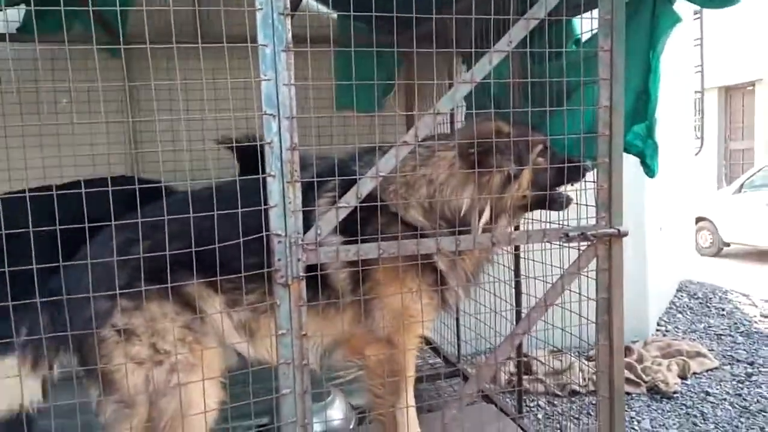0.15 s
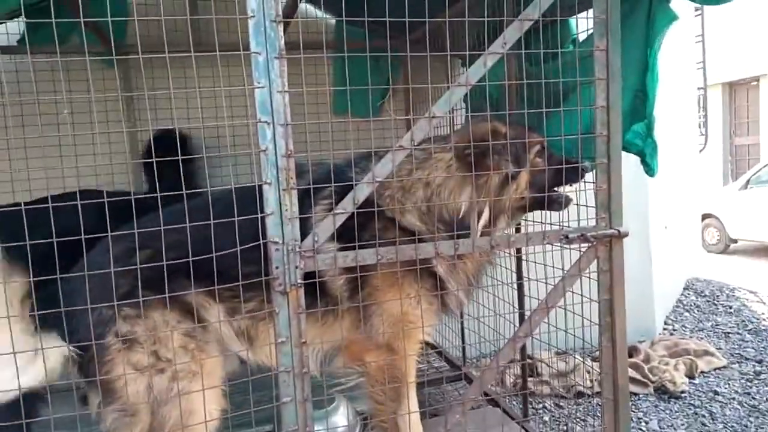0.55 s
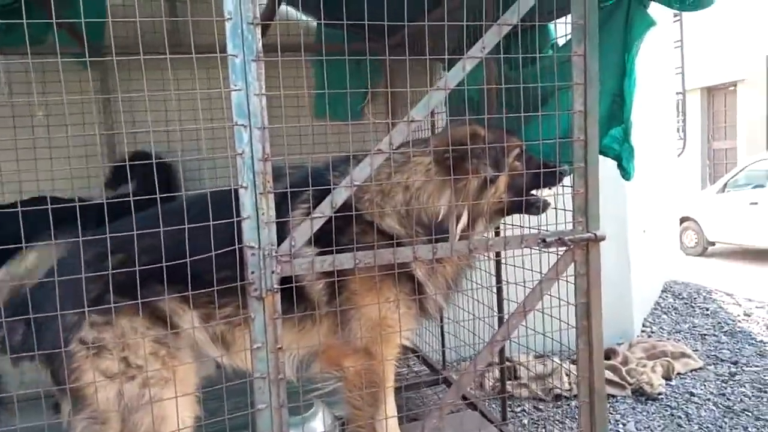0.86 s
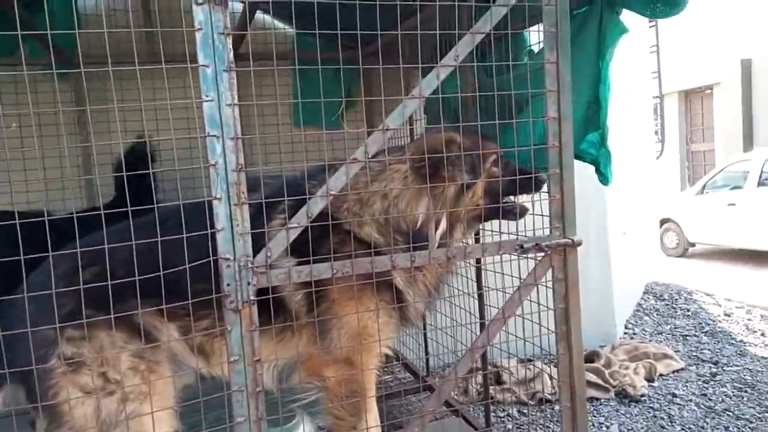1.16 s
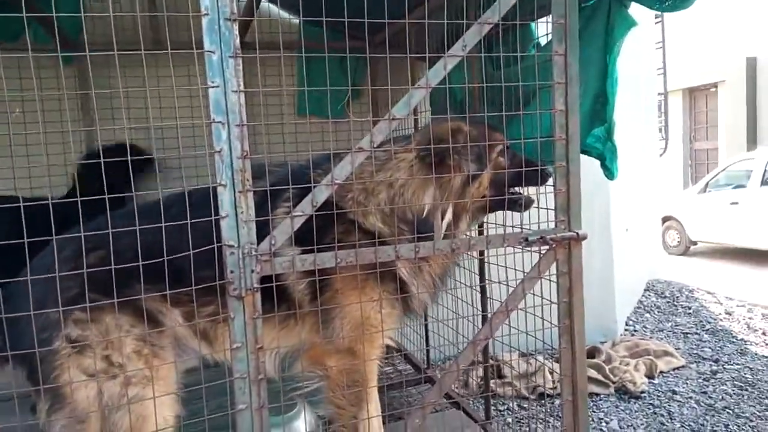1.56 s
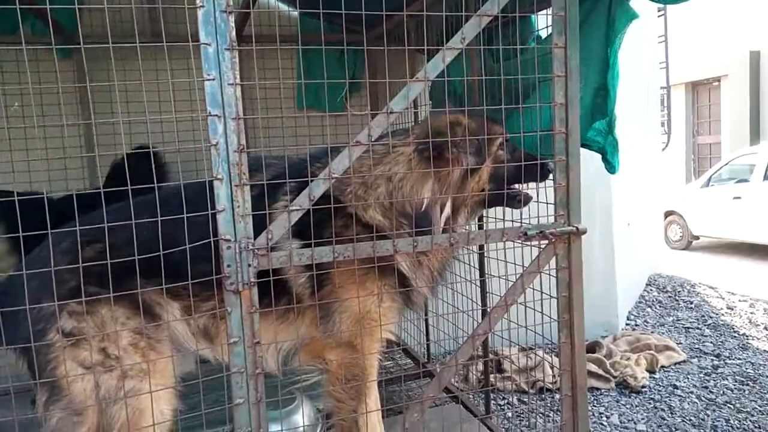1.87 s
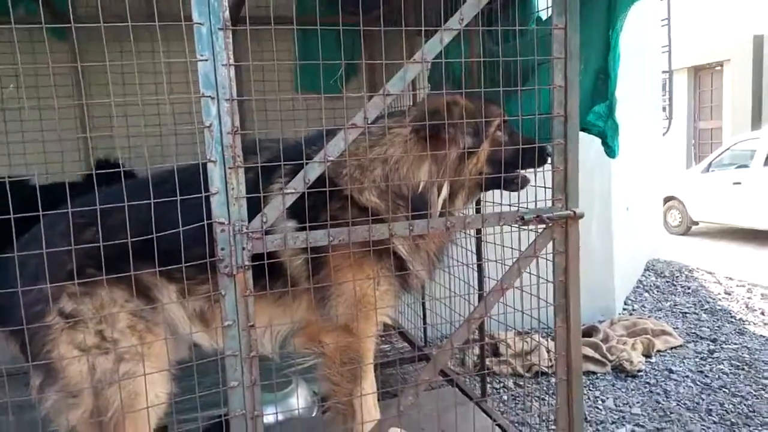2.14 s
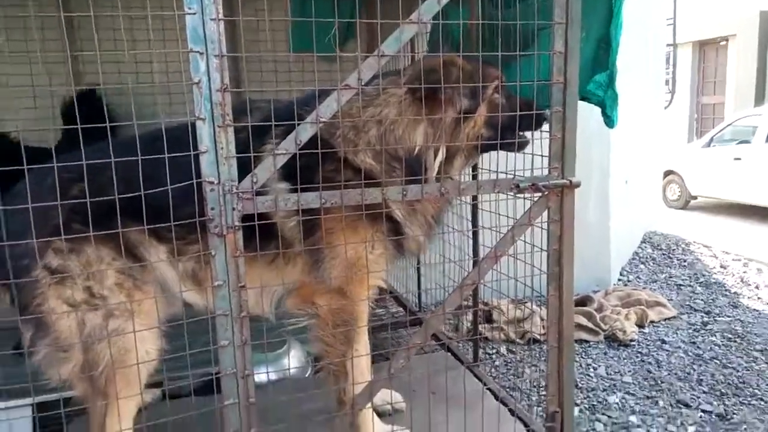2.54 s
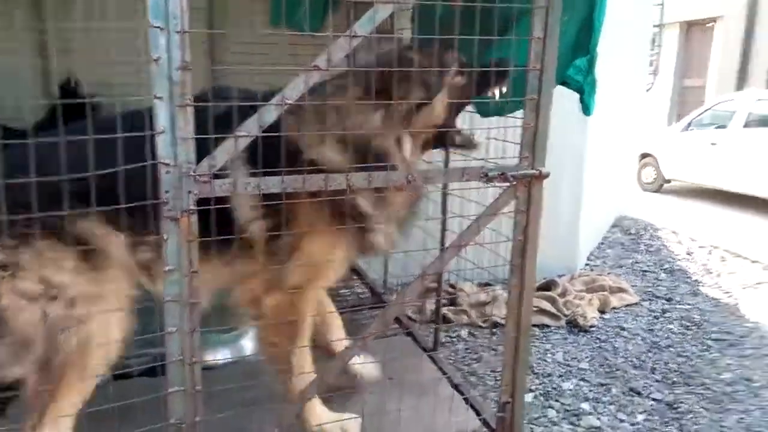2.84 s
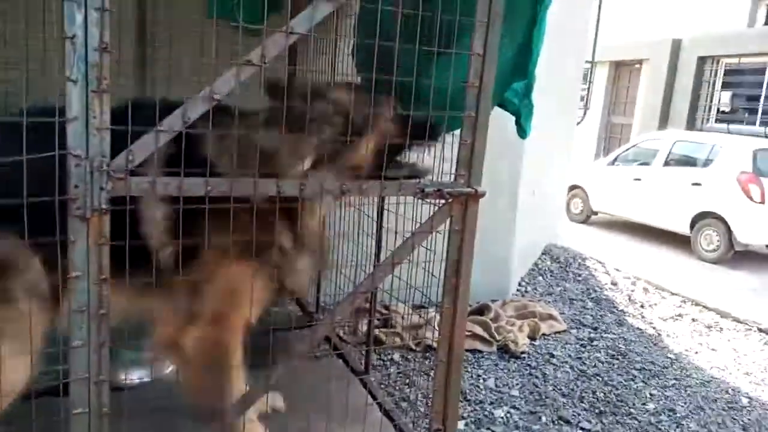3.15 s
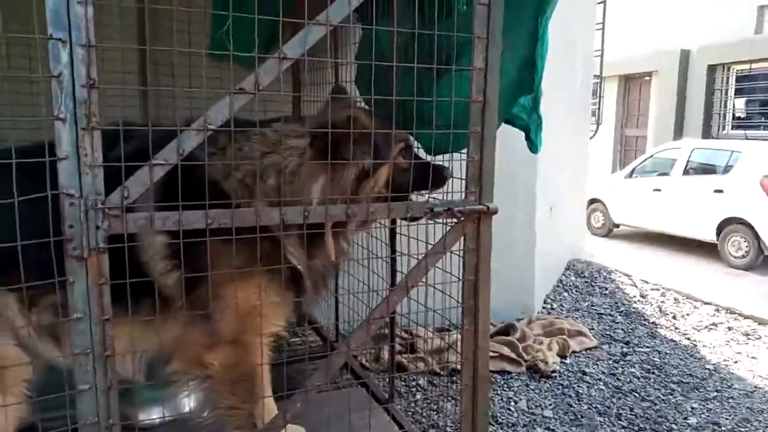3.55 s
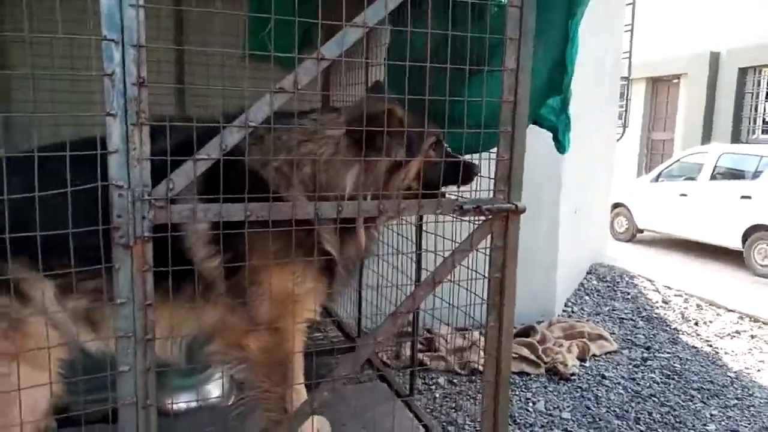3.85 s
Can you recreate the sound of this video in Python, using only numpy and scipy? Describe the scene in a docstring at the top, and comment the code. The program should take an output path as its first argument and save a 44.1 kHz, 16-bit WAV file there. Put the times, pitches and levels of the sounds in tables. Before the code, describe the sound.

A large dog close by growls low and rough, then smoother, draws a snoring breath, hums briefly and explodes into barks with a second dog; whines and a fluttering breath follow, in a wire kennel, phone microphone.

```python
"""Two big dogs in a wire kennel, a metre from a phone. First a rumbling in-breath, then the near dog growls
with shut jaws: fold pulses ring throat resonances over a chest tone. It snores in a breath, noise and
palate knocks, and hums; then both dogs bark across each other, wobbling harmonics with rasping air.
Whines trail off under a thin airy whistle, and a last in-breath flaps. Walls and roof answer the calls
briefly, coloured noise fills the yard, and the phone clips the loudest peaks."""
import sys
import numpy as np
from scipy import signal
from scipy.fft import rfft, irfft
from scipy.io import wavfile
from scipy.ndimage import uniform_filter1d

SR = 44100
rng = np.random.default_rng(int(sys.argv[2]) if len(sys.argv) > 2 else 0)


def to_wav(s):
    """Save 16-bit WAV."""
    ch = np.atleast_2d(s).T  # columns
    pcm = np.round(np.clip(ch, -1, 1) * 32767)  # PCM
    wavfile.write(sys.argv[1], SR, pcm.astype(np.int16))


N = 176400
T = np.arange(N) / SR


def undb(db):
    """Decibels to amplitude."""
    return 10 ** (np.asarray(db) / 20)


def unit(x):
    """Scale to rms 1."""
    return x / np.sqrt(np.mean(x ** 2))


def col(table, order):
    """A column of a table as a curve in time."""
    table = np.array(table)
    return np.interp(T, table[:, 0], table[:, order])


def gate(table, fade_s=0.018):
    """1 within the span of a table, short fades at its ends."""
    since_start = T - table[0][0]
    until_end = table[-1][0] - T
    return np.clip(np.minimum(since_start, until_end) / fade_s + .5, 0, 1)


def shape(points, hz):
    """Level in dB at hz, drawn through points over log frequency."""
    points = np.array(points)
    return np.interp(np.log(np.maximum(hz, 1)), np.log(points[:, 0]), points[:, 1])


def noise(points):
    """Noise coloured by (Hz, dB) points, silent below the first; rms 1."""
    hz = np.arange(N // 2 + 1) * SR / N
    gain = undb(shape(points, hz)) * (hz > points[0][0])
    return unit(irfft(rfft(rng.standard_normal(N)) * gain, N))


def ring(x, hz, width_hz):
    """One resonance."""
    return signal.lfilter(*signal.iirpeak(hz, hz / width_hz, fs=SR), x)


def ring_twice(x, hz, width_hz, second_width_hz):
    """Two resonances in a row at one frequency, for steeper sides."""
    return ring(ring(x, hz, width_hz), hz, second_width_hz)


def walk(rate_hz):
    """Smooth random curve with spread 1."""
    return unit(signal.lfilter(*signal.butter(2, rate_hz, fs=SR), rng.standard_normal(N)))


def resonate(x, peaks, lips=0):
    """Throat as parallel resonances, alternating in sign; parting lips change their gains."""
    out = 0
    for k, (hz, width_hz, db, *lip_db) in enumerate(peaks):
        gain = undb(db + sum(lip_db) * lips) * np.sqrt(60 / width_hz)
        out = out + (-1) ** k * gain * ring(x, hz, width_hz)
    return out


def airy(peaks, broad_db, lips=0):
    """Breath as noise through narrow resonances, over broad hiss; rms 1."""
    x = rng.standard_normal(N)
    band = signal.butter(3, [1200, 7500], "bandpass", fs=SR, output="sos")
    out = undb(broad_db) * signal.sosfilt(band, rng.standard_normal(N))
    for hz, width_hz, db, *lip_db in peaks:
        gain = undb(db + sum(lip_db) * lips) * np.sqrt(500 / width_hz)
        out = out + gain * ring_twice(x, hz, width_hz, 2 * width_hz)
    return unit(out)


def steady(x):
    """Even out the level over 50 ms: breath pressure holds while single cycles scatter."""
    return x / np.sqrt(uniform_filter1d(x ** 2, size=int(.05 * SR)) + 1e-12)


# Near dog, jaws shut. Each row: start in seconds, pitch in Hz, level in dB before the two dips in tone,
# level of the breath hiss in dB before it pulses with the folds.
GROWL = [(0.165, 121.7, -44.5, -52.5), (0.339, 127.4, -42, -54), (0.697, 126.7, -43, -57.5),
         (0.767, 137.7, -36.5, -55.5), (1.073, 143.5, -36.5, -56), (1.215, 152.2, -39, -51),
         (1.375, 149.7, -40, -52.5), (1.495, 143.3, -35.5, -56), (1.697, 135.4, -37, -57.5),
         (1.867, 138.9, -35.5, -54.5), (1.927, 131.5, -41.5, -61), (1.97, 130.2, -63, -63.5)]
HUM = [(2.615, 171.4, -42.5, -63), (2.639, 198.7, -48.5, -49), (2.659, 221.6, -40, -53.5),
       (2.895, 205.3, -43.5, -56), (2.93, 217.4, -40, -50)]
# Unevenness of the vocal folds. Each row: time in seconds, roughness 0-1.
ROUGH = [(0, .8), (.44, .75), (.47, .6), (.7, .6), (.77, .04), (1.18, .05), (1.28, .25), (1.4, .04),
         (2.6, .04), (2.62, .7), (2.66, .05)]
# Parting of the lips. Each row: time in seconds, opening 0-1.
LIPS = [(1.1, 0.21), (1.3, 1), (1.95, 1), (2.6, 0)]
# Resonances of the throat, then of the breath. Each row: centre in Hz, width in Hz, gain in dB before
# scaling for width, change in dB as the lips part.
THROAT = [(418.4, 37.5, 15, -0.5), (575, 26.5, -1, 7), (670, 75, -39.5, 18), (1060, 100, -9, 5.5),
          (1155, 73, -1.5, -2.5), (1287, 94, -9, 8.5), (2340, 59, -9, -6)]
HISS = [(1274, 94, 2.5, -2), (1700, 48, -1, -9.5), (1900, 64, -21, 16.5), (2390, 290, -2, 1),
        (2868, 76, -0.5, 0.5), (4625, 520, 1, -3), (5750, 77, -4.5, -7.5), (7280, 310, -7, -2.5)]
PULSE_S = .0001  # time for a fold pulse to fall to 1/e of its peak
ASPIRATE_DB, RATTLE_DB = -17.5, -9.5
CHEST_DB, CHEST_HZ = -3, 121.4  # chest level at this pitch, weaker above it
CHEST_SHAKE_DB, RATTLE_HZ = 3, 324
VALLEY_HZ, GAP_HZ = 714, 3860  # dips in the tone


def growl(table):
    """Fold pulses, uneven when rough, ring the throat; the chest carries the fundamental and a loose rattle;
    breath hisses per cycle."""
    hz, rough, lips = col(table, 1), col(ROUGH, 1), col(LIPS, 1)
    even = np.cumsum(hz) / SR  # count of cycles
    # one random timing and one random strength per cycle
    chance = rng.standard_normal((1200, 2))[even.astype(int)]
    jitter = uniform_filter1d(chance[:, 0], size=150)
    part = (even + rough * 0.15 * jitter) % 1
    from_pulse_s = np.minimum(part, 1 - part) / hz
    pulses = np.exp(-(from_pulse_s / PULSE_S) ** 2) * undb(rough * 4.7 * chance[:, 1])
    cycle_puff = np.exp(-part / 0.98)

    source = unit(pulses - uniform_filter1d(pulses, size=600))
    source = source + undb(ASPIRATE_DB) * cycle_puff * rng.standard_normal(N)
    voiced = steady(resonate(source, THROAT, lips))
    chest = undb(CHEST_DB) * (CHEST_HZ / hz) * np.sqrt(2) * np.sin(2 * np.pi * even - .8)
    chest = chest * undb(CHEST_SHAKE_DB * rough * walk(19))
    rattle = unit(ring_twice(pulses * chance[:, 0], RATTLE_HZ, 160, 160))
    chest = chest + rough * undb(RATTLE_DB) * rattle
    hiss = airy(HISS, -36, lips) * (0.26 + cycle_puff) * undb(walk(25))

    out = unit(voiced + chest) * undb(col(table, 2)) + hiss * undb(col(table, 3))
    # rough folds deepen the lower dip, parted lips fill the upper one
    out = out - np.minimum(1.5 * rough, 1) * ring(out, VALLEY_HZ, 390)
    out = out - (1 - 0.74 * lips) * ring(out, GAP_HZ, 1900)
    return gate(table, fade_s=.004) * out


# Steadier tone inside the rough growl. Each row: time in seconds, level in dB.
DRONE = [(0.17, -43), (0.21, -48.5), (0.435, -58), (0.45, -40.5), (0.69, -43.5), (0.74, -69)]
DRONE_HZ = 413.7


def drone():
    """A sine wavering in pitch and level."""
    hz = DRONE_HZ * (1 + 0.014 * walk(26.6))
    tone = np.sqrt(2) * np.sin(2 * np.pi * np.cumsum(hz) / SR)
    return gate(DRONE) * tone * undb(col(DRONE, 1) + 1.1 * walk(40))


# Near dog's barks, the second dog's barks across them, then whines. Each row: start in seconds, pitch in Hz
# before wobble, level of the fundamental in dB, rasp in dB re fundamental, lift of the overtones in dB.
BARK_1 = [(2.931, 258.7, -45.5, -9.5, -9), (2.953, 426.2, -19.5, -23.5, -19),
          (2.975, 556, -12.5, -15.5, -5.5), (2.993, 600.3, -7.5, -18, 2.5), (3.015, 681, -12.5, -23, -2.5),
          (3.035, 637, -23.5, -10, 1), (3.059, 555, -16.5, -17.5, 2), (3.071, 497, -47, -12, -13.5),
          (3.1, 467, -57.5, -30, -11.5)]
BARK_2 = [(3.118, 396, -28.5, -12, 12), (3.15, 429.6, -19.5, -16.5, -24), (3.188, 400, -26.5, -14, -29.5),
          (3.251, 583, -10.5, -23, -6), (3.271, 598, -29, -3, 10), (3.288, 642, -37.5, -22, -5.5),
          (3.311, 679, -16.5, -19, 2), (3.35, 523, -44.5, -24.5, -3)]
OTHER_1 = [(2.993, 410.5, -39.5, -14, 3.5), (3.012, 425.8, -17, -4, 8), (3.056, 446.5, -17.5, -6, 3.5),
           (3.085, 335.6, -23.5, -14, 2.4), (3.125, 271, -34, -1, -0.5)]
OTHER_2 = [(3.231, 298.9, -43, -6.5, 6), (3.244, 347.2, -27.5, 7, 8.5), (3.268, 400.3, -16.5, -9, 10.5),
           (3.284, 428.2, -23.5, -4, 5.5), (3.309, 427.6, -17.5, -17.5, 12.1),
           (3.329, 411, -23, -3.5, 15.5), (3.352, 297.7, -33.5, -20, 0.87), (3.384, 280, -38.5, -4, 3)]
WHINE_1 = [(3.384, 445, -28, -3.5, -23), (3.404, 460.7, -20.5, -19, -37), (3.452, 359.7, -30, -11, -4),
           (3.52, 307, -42, -4, -13), (3.55, 266, -53, -5, -0.5)]
WHINE_2 = [(3.461, 759, -43.5, -7, -12), (3.561, 562, -37, -8.5, -29), (3.6, 528, -50, -4, -20)]
# Open mouth. Each row: frequency in Hz, gain in dB, used relative to that at the fundamental.
MOUTH = [(200, 12), (600, 1.5), (900, -4), (1350, -7), (1550, -20), (2200, -17.5), (3000, -36), (7000, -47)]
# Colour of the rasping air. Each row: frequency in Hz, level in dB per Hz before scaling to rms 1.
RASP = [(120, -78), (200, -57), (422, 2.5), (510, -28), (849, 5.5), (956, -4.5), (1300, -2.5), (1450, -11),
        (1840, -5), (3400, -23.5), (4420, -79), (7480, -120)]
THIRD_SHARE = 0.14  # extra part of the lift for harmonics above the octave
WOBBLE = .026  # spread of the pitch, as a share, at full effort
SHIMMER_DB, RASP_PATCHY_DB = 0.7, 2  # spread of the fundamental's level, and of the rasp's
TOP_HZ = 8500  # no harmonics from here up; the phone also cuts here


def call(table):
    """A bark or whine: wobbling harmonics through the open mouth, with air that rasps once per cycle."""
    effort = np.clip((col(table, 2) + 40) / 25, .25, 1)
    hz = col(table, 1) * (1 + WOBBLE * effort * walk(120))
    phase = 2 * np.pi * np.cumsum(hz) / SR
    tone = 0
    for k in range(1, 15):
        mouth_db = shape(MOUTH, k * hz) - shape(MOUTH, hz)
        lift_db = col(table, 4) * ((k > 1) + THIRD_SHARE * (k > 2))
        shimmer_db = SHIMMER_DB * min(k * k, 7) * walk(90)  # overtones flicker more
        harmonic = np.sqrt(2) * np.cos(k * phase + .3 * max(k - 2, 0) ** 2)
        tone = tone + (k * hz < TOP_HZ) * undb(mouth_db + lift_db + shimmer_db) * harmonic
    rasp = noise(RASP) * undb(col(table, 3) + RASP_PATCHY_DB * walk(120))
    rasp = rasp * (1 + 0.79 * np.cos(phase))
    return gate(table) * undb(col(table, 2)) * (tone + rasp)


# Treble of the air driven out with the barks. Each row: time in seconds, level in dB, centre of its
# brightest band in Hz.
BARK_AIR = [(2.93, -64, 6250), (2.948, -47.5, 6070), (3.014, -32.5, 5720), (3.056, -29.5, 5770),
            (3.162, -52.5, 6340), (3.256, -34, 5180), (3.302, -29.5, 6400), (3.342, -31, 5930),
            (3.378, -46, 6470), (3.414, -44, 6656), (3.616, -57.5, 6900)]
# Its broad part. Each row: frequency in Hz, level in dB per Hz before scaling to rms 1.
BARK_AIR_COLOUR = [(1650, -40), (2800, -5), (3380, -8.5), (4550, -3.5), (7400, 1), (8460, -24),
                   (11000, -60.5), (18600, -120)]
# Its narrow bands. Each entry: centre in Hz.
BARK_AIR_BANDS = (5040, 5350, 6560, 7110)
BAND_WIDTH_HZ, BAND_PEAK_DB, BAND_REST_DB = 470, 15, -16.5


def bark_air():
    """Bright air with the barks: broad when loud, and bands that light up near a wandering centre."""
    level_db, centre = col(BARK_AIR, 1), col(BARK_AIR, 2)
    air = noise(BARK_AIR_COLOUR) * undb(0.58 * (level_db + 45.0) + 1.3 * walk(80))
    for hz in BARK_AIR_BANDS:
        band = unit(ring_twice(rng.standard_normal(N), hz, BAND_WIDTH_HZ, BAND_WIDTH_HZ))
        near = np.exp(-((centre - hz) / 700) ** 2)
        air = air + band * undb(BAND_PEAK_DB * near + BAND_REST_DB + 3.8 * walk(35))
    return gate(BARK_AIR) * steady(air) * undb(level_db)


# Throat while breathing in. Each row: centre in Hz, width in Hz, gain in dB before scaling for width.
PALATE = [(131, 47, 1.5), (404.6, 30, 0), (567.5, 46, 1), (1330, 80, 0)]
FLAP_HZ, FLAP_DIRECT = 444, 0.17  # resonance of a knock, and share that bypasses it


def flap(x):
    """A soft knock that swells for a cycle or two in the throat."""
    return resonate(ring(x, FLAP_HZ, 230) + FLAP_DIRECT * x, PALATE)


# Three in-breaths. Each row: start in seconds, level of the air in dB before the flaps stir it, level of
# the low rumble in dB before its trim.
INHALE = [
    [(0.0, -58, -29.5), (0.038, -60.5, -37.5), (0.104, -60.5, -48), (0.148, -64, -73), (0.16, -54, -56)],
    [(1.98, -63, -45.5), (2.058, -51, -41), (2.08, -55, -38.5), (2.378, -63, -44.5), (2.412, -60, -43),
     (2.6, -69, -73)],
    [(3.6, -62, -35.5), (3.65, -46, -29.5), (3.71, -47, -37), (3.854, -56, -32.5), (3.868, -55, -45.5),
     (4.0, -74, -47)],
]
# Palate flaps. Each row: start in seconds, peak of the knock in dB.
FLAPS = [(0.014, -41), (0.029, -37.5), (0.074, -43), (0.106, -43), (2.016, -42.5), (2.083, -34.5),
         (2.116, -42), (2.149, -40), (2.182, -39), (2.214, -52), (2.247, -40), (2.279, -37), (2.311, -38.5),
         (2.346, -41.5), (2.381, -41), (2.416, -38.5), (2.449, -38), (2.483, -39.5), (2.517, -42.5),
         (3.636, -28.5), (3.669, -41), (3.755, -35), (3.796, -36), (3.827, -39), (3.852, -44), (3.896, -37),
         (3.924, -42), (3.94, -46)]
# Resonances of the short in-breaths, then of the long snore. Each row: centre in Hz, width in Hz, gain in
# dB before scaling for width.
AIR = [(1316, 26, -0.5), (1763, 390, 4.5), (2230, 76, 1), (2995, 100, -2), (3910, 280, 1),
       (6250, 320, -2.5), (6730, 100, 1)]
SNORE_AIR = [(1330, 92, 3.5), (2163, 69, -3), (2840, 130, -1.5), (4250, 210, 1), (7100, 320, -4)]
RUMBLE_TRIM_DB, TICK_AIR_DB = -11, -1
FLAP_S = .0004  # half the length of a knock
FLAP_AIR_DB, FLAP_AIR_S = 11, .011  # lift of the air after a flap, and its decay time


def snores():
    """In-breaths: rushing air, and the palate flaps, steadily or singly, knocking the throat."""
    knock = np.zeros(N)
    for s, db in FLAPS:
        knock[int(s * SR)] = undb(db)
    soft = np.hanning(int(2 * FLAP_S * SR))
    peak = np.max(flap(np.r_[soft, np.zeros(2000)]))
    out = flap(np.convolve(knock, soft)[:N]) / peak
    # each flap stirs the air, dying away
    burst = signal.lfilter([1], [1, -np.exp(-1 / (FLAP_AIR_S * SR))], 1. * (knock > 0))
    for table, peaks in zip(INHALE, (AIR, SNORE_AIR, AIR)):
        air_db, rumble_db = col(table, 1), col(table, 2) + RUMBLE_TRIM_DB
        air = airy(peaks, -7.0) * undb(air_db + 0.25 * walk(7.7) + FLAP_AIR_DB * (burst - 0.24))
        rumble = unit(resonate(rng.standard_normal(N), PALATE[:3])) * undb(rumble_db + 0.92 * walk(44))
        tick = unit(ring(rng.standard_normal(N), 3800, 980)) * undb(air_db + TICK_AIR_DB) * burst ** 2
        out = out + gate(table) * (air + rumble + tick)
    return out


PUFF_S, PUFF_LENGTH_S, PUFF_DB = 2.345, .04, -52.5


def puff():
    """One quick broad puff of breath noise in mid snore."""
    return airy(SNORE_AIR, 1) * undb(PUFF_DB) * gate([[PUFF_S], [PUFF_S + PUFF_LENGTH_S]])


# Narrow airy band over the whines. Each row: time in seconds, level in dB.
WHISTLE = [(3.39, -52), (3.444, -42.5), (3.572, -49), (3.59, -66)]
WHISTLE_HZ, WHISTLE_WIDTH_HZ = 1850, 50


def whistle():
    """Noise squeezed through a narrow resonance."""
    air = ring_twice(rng.standard_normal(N), WHISTLE_HZ, WHISTLE_WIDTH_HZ, WHISTLE_WIDTH_HZ)
    return gate(WHISTLE) * unit(air) * undb(col(WHISTLE, 1))


# Small clicks. Each row: start in seconds, strength in dB before a fixed gain and the resonance.
TICKS = [(0.1584, -29), (1.6424, -27.5)]
TICK_HZ, TICK_WIDTH_HZ = 4900, 1700


def ticks():
    """Tiny bright clicks: impulses through a wide resonance."""
    x = np.zeros(N)
    for s, db in TICKS:
        x[int(s * SR)] = 8 * undb(db)
    return ring_twice(x, TICK_HZ, TICK_WIDTH_HZ, 2 * TICK_WIDTH_HZ)


KENNEL_T60_S, KENNEL_DB = .17, -13.5  # decay by 60 dB, and level of the echoes
KENNEL_HZ = 3150  # upper edge of the echoes


def kennel(x):
    """Dense short echoes off walls and roof, duller than the direct sound."""
    t = T[:SR // 2]
    tail = rng.standard_normal(len(t)) * undb(-60 * t / KENNEL_T60_S) * (t > .004)
    tail = signal.lfilter(*signal.butter(1, [250, KENNEL_HZ], "bandpass", fs=SR), tail)
    return undb(KENNEL_DB) * signal.fftconvolve(x, tail / np.sqrt(np.sum(tail ** 2)))[:N]


# Yard background. Each row: frequency in Hz, level in dB per Hz before scaling to rms 1.
YARD = [(18, -62), (30, -12.5), (412, 1), (1340, -10), (1470, -12), (1740, -13), (3600, -18), (4800, -17),
        (6840, -12), (8460, -51.5), (11000, -66)]
YARD_DB = -60.5


def yard():
    """Steady coloured noise behind the dogs."""
    return noise(YARD) * undb(YARD_DB)


def scene():
    """Both dogs in the kennel, with the yard behind; only the calls echo."""
    calls = sum(call(c) for c in (BARK_1, BARK_2, OTHER_1, OTHER_2, WHINE_1, WHINE_2))
    calls = signal.sosfilt(signal.butter(3, 200, "highpass", fs=SR, output="sos"), calls)
    throaty = growl(GROWL) + growl(HUM) + drone() + snores() + puff()
    return (calls + kennel(calls) + bark_air() + throaty + whistle() + ticks() + yard())[None]


MIC_LOW_HZ, MIC_HIGH_HZ = 40.2, 7240
SQUELCH_DB, SQUELCH_POWER, SQUELCH_S = -53, 0.9, .025  # threshold, steepness, averaging time
CLIP = .99


def record(dry):
    """The phone's microphone rolls off both ends, a suppressor shuts on faint sound, the top is cut and
    the peaks clip."""
    band = signal.butter(3, [MIC_LOW_HZ, MIC_HIGH_HZ], "bandpass", fs=SR, output="sos")
    mic = signal.sosfilt(band, dry)
    loud = np.sqrt(uniform_filter1d(mic ** 2, size=int(SQUELCH_S * SR)) + 1e-12)
    mic = mic * np.minimum(loud / undb(SQUELCH_DB), 1) ** SQUELCH_POWER
    cut = signal.sosfilt(signal.ellip(8, .2, 60, TOP_HZ, fs=SR, output="sos"), mic)
    clipped = np.clip(cut, -CLIP, CLIP)
    # a last low-pass trims the spray of the clipping
    return signal.sosfilt(signal.ellip(8, .2, 70, 15500, fs=SR, output="sos"), clipped)


dry = scene()
out = record(dry)
to_wav(out)
```